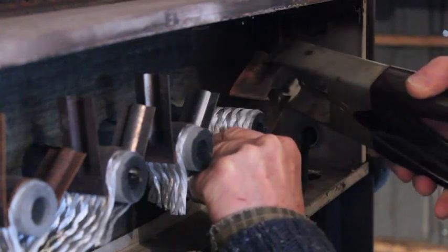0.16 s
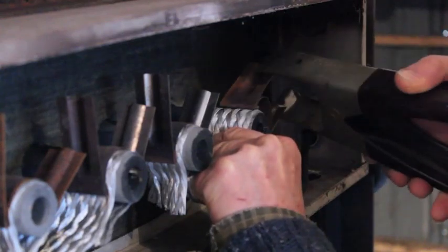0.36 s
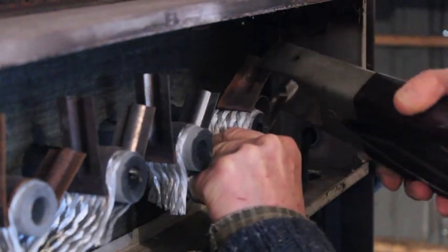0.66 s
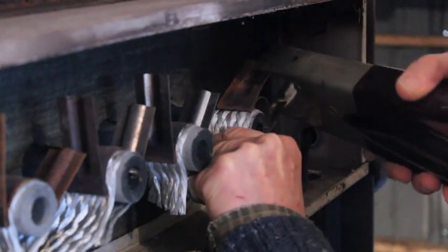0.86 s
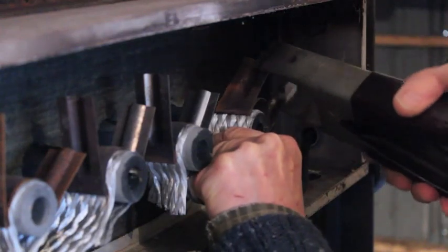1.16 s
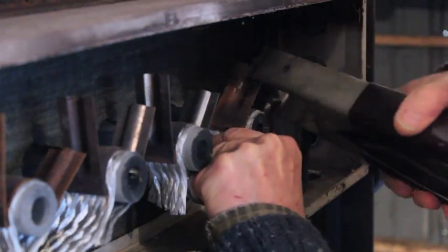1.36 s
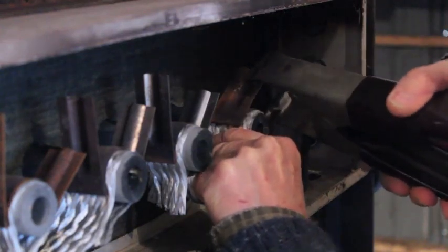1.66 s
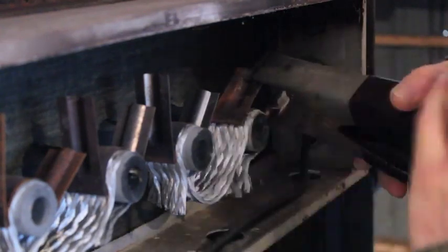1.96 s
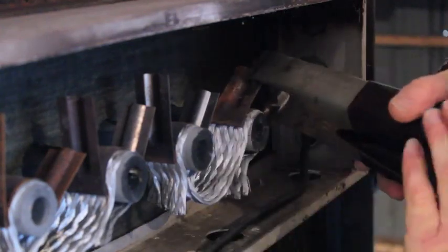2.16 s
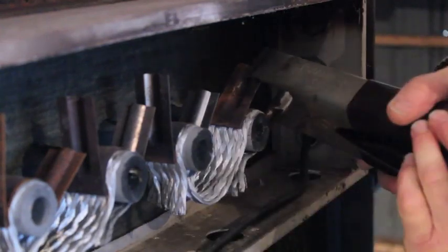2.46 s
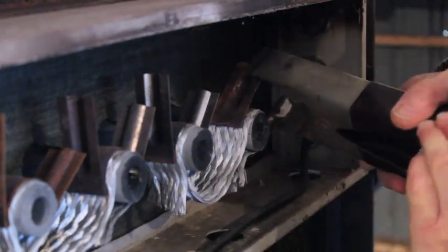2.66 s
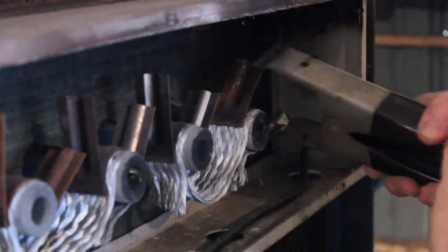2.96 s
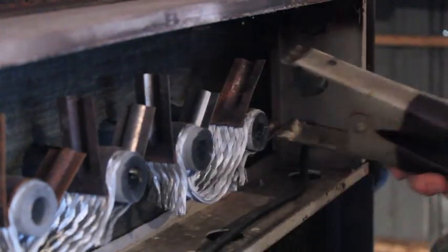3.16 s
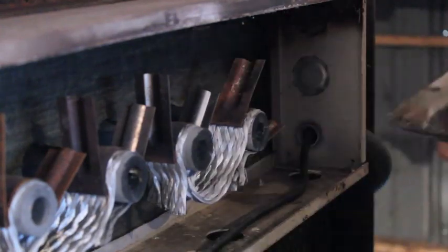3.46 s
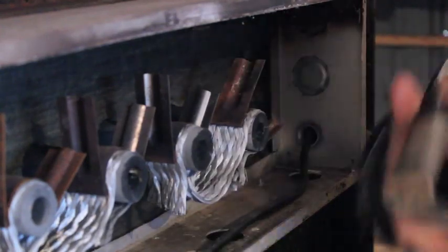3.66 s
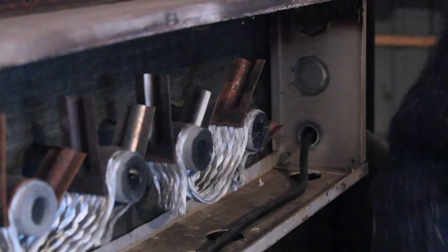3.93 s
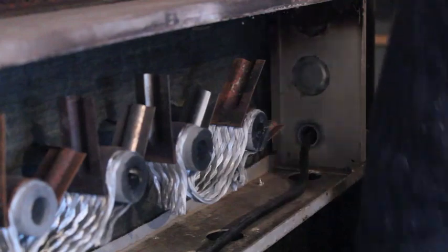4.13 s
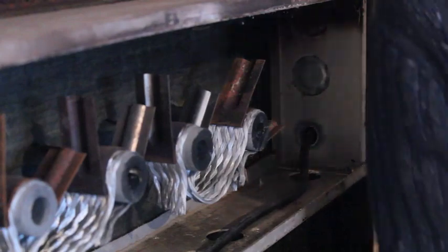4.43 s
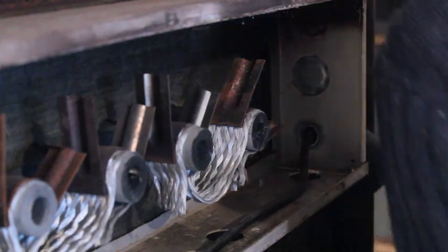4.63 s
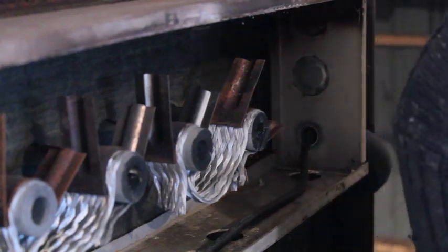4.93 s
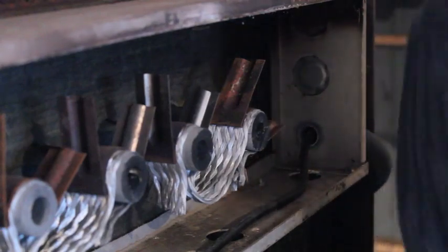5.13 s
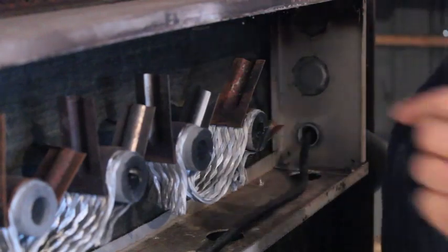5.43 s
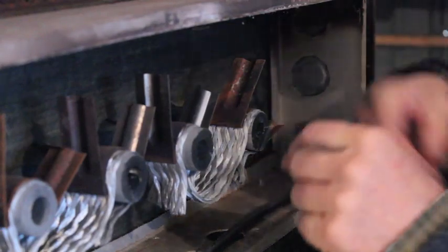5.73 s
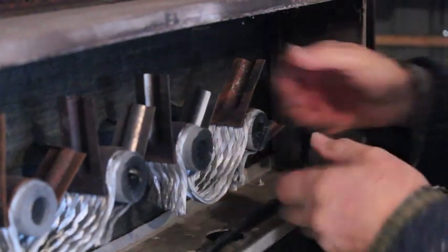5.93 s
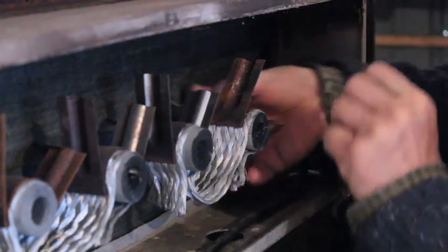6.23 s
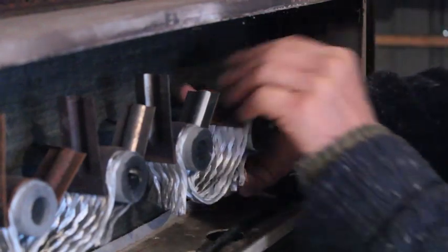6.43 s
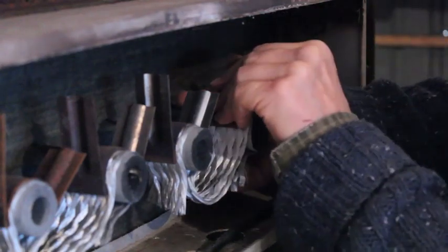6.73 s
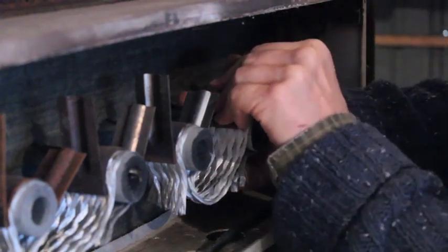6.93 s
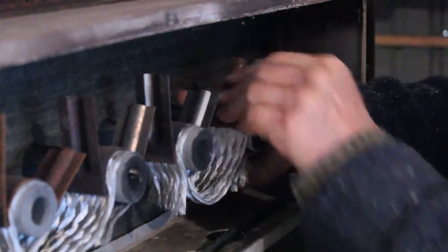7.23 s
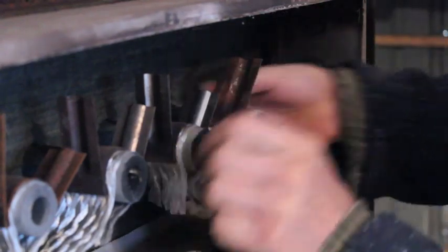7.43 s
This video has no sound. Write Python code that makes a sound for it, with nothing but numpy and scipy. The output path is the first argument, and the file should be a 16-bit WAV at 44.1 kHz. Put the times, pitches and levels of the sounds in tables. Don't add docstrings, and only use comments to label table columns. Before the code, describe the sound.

Small dry metal sounds over steady air hiss and a faint motor hum: light ticks and braid rustle, one hard snap, a quick clack and scrape, a ratchety spring creak ending in a thin ring, rough scraping into a bright knock, a short slide, then a tool put down in a double clunk. Near quiet follows, with cloth brushing and a brief bright rattle. Close microphone, short room echo.

```python
import sys
import numpy as np
from scipy import signal
from scipy.fft import rfft, irfft
from scipy.io import wavfile
from scipy.ndimage import uniform_filter1d

SR = 44100
rng = np.random.default_rng(int(sys.argv[2]) if len(sys.argv) > 2 else 0)


def store_wav(level_fs):
    pcm = np.round(np.clip(np.atleast_2d(level_fs), -1, 1) * 32767)
    wavfile.write(sys.argv[1], SR, pcm.T.astype(np.int16))


def to_linear_factor(level_db):
    exponent = np.asarray(level_db, float) / 20
    return 10 ** exponent


N = 334719
T = np.arange(N) / SR

# pitch_hz, density_db (per Hz)
SHOP_HISS = [(15, -47), (25, -6.5), (37, -16.5), (130, -12.5), (228, -6.5), (307, -7), (691, -5),
             (1040, -6.5), (4100, -13), (10000, -19), (15800, -17.5)]
# pitch_hz, t60_s
ROOM_DECAY = [(180, 0.27), (500, 0.26), (1200, 0.35), (3000, 0.38), (6000, 0.35), (11000, 0.13)]

# peak_s, swell_s, fade_s, level_db (at the peak)
SLEEVE_STROKES = [
    (5.787, 0.03, 0.057, -54.5),
    (6.22, 0.34, 0.22, -58.5),
    (6.45, 0.39, 0.085, -54.5),
    (6.59, .04, 0.054, -58),
    (7.37, 0.12, .012, -56.5),
]
BRAID_STROKES = [
    (.002, 0.0061, 0.019, -44.5),
    (.42, 0.01, 0.029, -53),
    (.685, 0.033, 0.06, -50.5),
    (.85, 0.026, 0.076, -55.5),
    (.964, .018, 0.059, -54),
    (1.1, 0.17, .04, -59.5),
    (1.258, 0.052, 0.038, -45.5),
    (1.375, 0.032, .03, -49),
    (1.528, 0.022, 0.072, -51.5),
    (1.6, 0.11, 0.024, -54),
]
GRATE_STROKES = [
    (1.393, 0.017, 0.0025, -26.5),
    (1.401, .003, 0.017, -36),
    (3.501, .002, .03, -40),
    (7.214, .002, .015, -45),
    (7.222, .002, 0.018, -42),
    (7.233, .002, .04, -48),
]
JAW_STROKES = [
    (2.6, 0.22, .19, -65),
    (2.8, 0.014, .004, -55),
    (2.84, 0.01, 0.028, -44),
    (2.867, 0.013, 0.029, -42.5),
    (2.9, 0.014, 0.056, -45),
    (2.98, .1, 0.071, -54),
    (3.086, 0.11, 0.0098, -44.5),
]
PULL_OFF_STROKES = [
    (1.8, 0.052, 0.34, -55.5),
    (1.895, 0.0096, 0.02, -34.5),
    (1.93, .006, .04, -46),
    (1.952, 0.0087, 0.082, -38.5),
    (1.98, 0.037, 0.071, -38.5),
]
DRAG_STROKES = [
    (3.18, 0.022, 0.086, -44.5),
    (3.226, 0.1, 0.073, -40),
]
LIFT_STROKES = [
    (3.3645, 0.003, 0.03, -42),
    (3.382, 0.035, 0.046, -36.5),
    (3.407, .02, 0.068, -39.5),
    (3.44, 0.019, .04, -37.5),
    (3.479, .008, 0.064, -43),
    (3.512, 0.02, 0.08, -37),
]
SLIDE_STROKES = [
    (4.125, 0.054, .02, -58),
    (4.14, 0.011, 0.091, -38.5),
    (4.172, 0.033, 0.038, -36.5),
    (4.192, .003, 0.022, -40),
    (4.209, 0.013, 0.048, -38),
    (4.24, 0.063, 0.009, -42.5),
]

# pitch_hz, density_db (per Hz)
CLOTH_TONE = [(600, -9.5), (1500, -5.5), (2500, -2), (5000, -6), (9000, -9.5), (16000, -12)]
BRAID_TONE = [(500, -8), (1500, -4.5), (3000, -1.5), (6000, -8.5), (10000, -10.5), (16000, -5)]
JAW_TONE = [(400, -2.5), (900, 0.5), (2000, -9), (5000, -0.5), (9000, -1), (16000, -13)]
PULL_OFF_TONE = [(230, -48), (468, -5.5), (723, -7), (890, 0.5), (1450, -3.5), (2600, 2), (10700, -8.5),
                 (16000, -17)]
DRAG_TONE = [(240, -35), (400, -29), (879, -9), (1330, -17), (1760, -6.5), (3070, -5.5), (4650, 1),
             (8630, -8), (16000, -29)]
LIFT_TONE = [(230, -16.5), (890, -2.5), (1380, -7), (2200, 1), (4410, -3.5), (4820, 0), (12100, -14.5),
             (16000, -21)]
SLIDE_TONE = [(120, -23), (439, -15.5), (689, -16.5), (821, -9), (1100, -16), (3100, -11), (5250, -9.5),
              (6770, -15.5), (10800, -17), (16000, -25)]
# pitch_hz, width_hz, level_db
CLOTH_PEAKS = [(2200, 420, 6), (5670, 240, 5), (7370, 200, 8.5)]
BRAID_PEAKS = [(3570, 170, 7.5), (5200, 300, 11.5), (6300, 280, 10), (7850, 570, 7.5), (10600, 320, 10.5),
               (11750, 250, 8), (15000, 350, -9)]
JAW_PEAKS = [(850, 180, 6), (1840, 510, 15), (3060, 120, 10.5), (4500, 310, 6), (6300, 200, 3),
             (9200, 270, -5), (14000, 500, 1)]

# start_s, level_db (peak)
CREAK_SLIPS = [(2.4928, -42), (2.5038, -42), (2.5197, -42), (2.5367, -41), (2.549, -46), (2.5611, -41),
               (2.5766, -41), (2.5851, -39), (2.597, -46), (2.6095, -44), (2.634, -46), (2.6604, -42),
               (2.6699, -41), (2.679, -44), (2.6919, -44), (2.7068, -40), (2.7462, -42), (2.772, -47),
               (2.7955, -46), (2.81, -45), (2.8368, -36), (2.8638, -32), (2.8987, -36), (2.9246, -32),
               (2.9444, -42), (2.964, -42), (3.005, -39), (3.0625, -39), (3.0858, -35)]
RATTLE_HITS = [(7.2108, -18), (7.2112, -18.5), (7.2122, -23), (7.2131, -21), (7.2164, -20), (7.2172, -25),
               (7.218, -13), (7.219, -12), (7.22, -24), (7.2275, -18), (7.2285, -22), (7.2295, -14.5),
               (7.2305, -26), (7.2317, -31), (7.24, -27), (7.241, -27), (7.248, -33), (7.2495, -40)]
LET_GO_HITS = [
    (1.889, -27),
    (1.897, -20.5),
    (1.9035, -18.5),
    (1.91, -29),
    (1.9165, -25.5),
]
LAID_HITS = [
    (4.9485, -18.5),
    (4.9508, -24),
    (4.9527, -12),
    (4.9555, -13),
    (4.959, -19.5),
    (4.963, -17),
    (4.968, -18),
    (4.975, -26),
    (4.984, -31),
    (4.99, -25),
]
ROCK_HITS = [(5.0075, -14), (5.0095, -11), (5.013, -24), (5.018, -22), (5.0235, -19), (5.029, -25),
             (5.036, -13.5), (5.0385, -12), (5.0445, -18), (5.05, -27), (5.057, -18), (5.064, -29),
             (5.071, -29), (5.078, -37)]
SNAP_HITS = [
    (1.3928, -14.5),
    (1.3953, -10),
    (1.3968, -14.5),
]
KNOCK_HITS = [(3.4961, -8.5), (3.4967, -8.5), (3.4975, -10), (3.4985, -17), (3.5022, -23), (3.5056, -17),
              (3.5068, -19), (3.5085, -20), (3.511, -22), (3.5355, -30), (3.585, -42)]

# pitch_hz, density_db (per Hz)
CLIP_TONE = [(250, -25), (350, -5), (600, -20), (1800, -10.5), (4000, -18.5), (6000, -8.5), (8500, -9),
             (10500, -6), (13300, -12), (16000, -7.5)]
LET_GO_TONE = [(150, -42), (250, -17), (468, -5), (1280, 1.5), (1880, 4), (4340, -18), (8700, -19),
               (16000, -27)]
LAID_TONE = [(35, -61), (60, -14), (503, -8), (880, -4), (1170, -3.5), (2250, -11), (4500, -23.5),
             (16000, -42)]
ROCK_TONE = [(35, -62), (60, -30), (579, 0), (651, -8), (749, -4.5), (1300, -10.5), (2900, -15.5),
             (16000, -37)]
SNAP_TONE = [(150, -54), (550, -15), (980, -2.5), (1500, -3.5), (2250, -4.5), (2900, -11), (10300, -13.5),
             (16000, -35)]
KNOCK_TONE = [(200, -32), (600, -23), (1000, -11), (1500, -12), (3000, -9.5), (4800, -4.5), (6000, -11),
              (11000, -16), (16000, -18)]
# pitch_hz, width_hz, level_db
SPRING_PEAKS = [(5500, 600, 7.5), (7400, 440, 13), (9500, 460, 5), (13000, 3100, 13), (15000, 700, 13)]
CLIP_PEAKS = [(5500, 410, 10), (6700, 600, 3), (10100, 500, 11), (11700, 640, 4), (15000, 830, 2)]
LAID_PEAKS = [(520, 190, 8), (1150, 120, 0), (2300, 140, 8), (3100, 180, 3)]
ROCK_PEAKS = [(800, 240, 3.5), (2300, 710, 4.5), (3020, 130, 3), (3700, 170, -2), (4500, 230, 1)]
SNAP_PEAKS = [(950, 350, 8), (2200, 220, 7.5), (3500, 240, -1), (5200, 310, 9)]
KNOCK_PEAKS = [(940, 110, 11.5), (2070, 400, 11.5), (3700, 280, 15.5), (8300, 670, 13.5), (11500, 600, 8)]
# pitch_hz, level_db, t60_s
BENCH_MODES = [(79, -35, 0.18), (145, -32, 0.091), (250, -15, 0.072), (410, -25, 0.08), (498, -11.5, 0.031),
               (580, -25, 0.06), (840, -32, 0.05), (996, -25, 0.083), (1160, -38, 0.036),
               (1620, -29, 0.057), (2194, -33, 0.055), (2870, -33, 0.073)]
CABINET_MODES = [(80.6, -43, 0.41), (111.4, -40.5, 0.35), (186, -38, 0.23), (317, -35.5, 0.41),
                 (355, -43, 0.16), (467, -30.5, 0.13), (880, -36, .2), (986, -33.5, 0.45), (2220, -45, 0.2),
                 (4400, -42, 0.05), (5800, -40, 0.11)]
TOOL_MODES = [(257, -41.5, 0.093), (650, -46, .08), (1173, -37, 0.2), (2260, -32, 0.11), (3700, -40, 0.09),
              (2970, -26.5, 0.1), (5000, -34, .06)]

# start_s, level_db (peak), pitch_hz
STRAY_TICKS = [(.008, -39, 1440), (.417, -46, 3000), (.428, -44, 9000), (0.679, -36, 5770),
               (0.708, -37.5, 6440), (0.931, -38, 4500), (.933, -40.5, 2300), (1.054, -47, 4500),
               (1.269, -42, 7000), (1.606, -41, 5200), (1.931, -26.5, 6500), (1.935, -34, 6000),
               (1.959, -30, 2500), (1.966, -18.5, 7040), (2.645, -41, 4200), (2.823, -40, 4500),
               (2.846, -44, 12000), (2.872, -40, 12500), (2.886, -44, 11000), (2.937, -39, 12000),
               (3.053, -35, 7000), (3.0655, -30, 5000), (3.3638, -37, 9000), (3.375, -37, 12000),
               (3.3805, -34, 12000), (3.387, -34, 12500), (3.392, -33, 12000), (3.419, -32, 10000),
               (3.45, -22.5, 1640), (3.461, -27, 2480), (3.476, -40, 11000), (3.485, -36, 11500),
               (3.493, -29, 11500), (5.0358, -21, 3280), (5.0092, -26, 3280), (3.535, -33, 13000),
               (4.233, -33, 5000), (4.183, -32, 5000), (3.708, -38, 780), (3.74, -41.5, 835),
               (3.748, -32.5, 3670), (4.113, -39, 8500), (7.2112, -19, 11000), (4.825, -35.5, 2200),
               (3.4966, -13.5, 8500), (7.2182, -19, 10000), (7.351, -44, 12000)]
# start_s, pitch_hz, level_db (peak), rise_s, t60_s
SINGLE_RINGS = [(0.004, 887, -39, 0.0017, 0.054), (2.86, 817, -55, 0.018, 0.41),
                (2.8985, 7800, -34, .0004, .015), (2.924, 7730, -24, .0005, 0.0094),
                (3.033, 1007, -37.5, 0.0033, 0.098), (3.063, 4965, -35, 0.0062, 0.62),
                (3.068, 4965, -22.5, 0.027, 0.24), (3.085, 13000, -56, 0.0032, .2),
                (3.449, 996, -31, 0.00073, 0.15), (3.451, 1030, -49, 0.00077, 0.043),
                (4.071, 1657, -40, 0.0091, 0.069), (7.366, 2060, -46, .003, 0.054),
                (3.4962, 3720, -21, .0003, .03), (3.4953, 8410, -22, .0002, 0.016),
                (3.5053, 3780, -32, .0005, 0.025), (3.535, 3780, -38, .001, .06),
                (3.497, 893, -29, 0.0013, .04), (4.951, 518, -8, .002, 0.035), (5.043, 703, -18.5, .001, .03),
                (5.012, 520, -15, .002, 0.044), (5.0365, 2910, -23.5, .0005, 0.031),
                (5.037, 825, -19.5, .001, .06), (5.056, 1000, -22, .004, 0.074),
                (1.402, 250, -43, .006, 0.24), (1.53, 5200, -51, .004, .1), (1.59, 5200, -52, .004, .06),
                (2.838, 5000, -40, .002, .04)]
# start_s, length_s, pitch_hz, level_db
SINGING_CHAFES = [(.63, .045, 5100, -66), (.68, .035, 7600, -72), (.838, 0.057, 6200, -63),
                  (.85, .04, 5500, -65), (.852, .025, 8600, -70), (.965, .04, 3500, -61),
                  (1.1, 0.077, 5100, -79), (0.9, 0.027, 3060, -72), (1.225, .065, 10700, -59),
                  (1.23, 0.067, 3700, -61), (1.262, 0.018, 6700, -61), (1.3, .03, 10700, -65),
                  (1.381, 0.024, 10600, -47), (1.42, 0.025, 2200, -55), (1.852, 0.039, 5500, -51),
                  (1.89, 0.016, 11000, -43), (1.945, 0.051, 10600, -47), (2.5, .22, 7500, -75),
                  (2.52, 0.22, 9400, -69), (2.84, 0.17, 851, -58), (2.851, 0.041, 4930, -44),
                  (2.855, .045, 8750, -56), (2.88, 0.028, 860, -43.5), (2.897, 0.034, 7850, -50),
                  (2.953, .008, 7800, -53), (3.002, 0.0052, 7500, -47), (3.03, .025, 9100, -63),
                  (2.898, 0.043, 4760, -51.5), (2.958, .05, 8850, -56), (2.98, .04, 14000, -58),
                  (3.012, 0.052, 8600, -62), (2.7, 0.037, 10700, -68), (3.372, 0.0093, 3490, -38),
                  (3.378, 0.016, 5200, -42), (4.158, .022, 5200, -39), (4.19, 0.014, 5400, -32),
                  (4.204, 0.011, 5200, -35), (4.15, .012, 8500, -46), (1.423, 0.017, 5800, -54),
                  (6.134, 0.16, 6300, -66), (6.17, 0.073, 5200, -66), (7.31, .025, 9000, -63),
                  (7.355, .025, 9500, -61), (7.368, .011, 6100, -65)]
# start_s, length_s, pitch_hz, level_db
BROAD_SCUFFS = [(1.353, 0.066, 3400, -53), (1.399, 0.046, 660, -50.5), (1.41, 0.049, 118, -54),
                (1.415, 0.034, 227, -46.5), (1.851, 0.032, 5460, -57), (1.93, 0.01, 6200, -41),
                (1.4, 0.035, 1480, -53), (1.95, 0.02, 5670, -42), (3.155, 0.07, 8800, -54),
                (3.24, 0.085, 5800, -53), (3.33, 0.1, 5430, -49), (3.427, 0.041, 2200, -44),
                (3.434, 0.016, 5000, -37.5), (4.104, 0.071, 800, -58), (4.131, 0.023, 1070, -46),
                (4.146, 0.046, 4640, -36.5), (4.19, 0.026, 4900, -36), (1.4, .06, 294, -46),
                (7.25, 0.033, 6000, -62), (4.195, .04, 11000, -50)]


def rms_one(x):
    return x / np.sqrt(np.mean(x ** 2) + 1e-20)


def add(out, s, sound):
    i = round(s * SR)
    out[i:i + len(sound)] += sound[:N - i]


def resonant(drive, hz, width_hz):
    radius = np.exp(-np.pi * width_hz / SR)
    angle = 2 * np.pi * hz / SR
    b, a = [1, 0.0016, -1], [1, -2 * radius * np.cos(angle), radius * radius]
    once = signal.lfilter(b, a, drive)
    return rms_one(signal.lfilter(b, a, once))


def body(tone, peaks=(), size=4096):
    hz = np.maximum(np.arange(size // 2 + 1) * SR / size, 1)
    tone_hz, tone_db = np.array(tone).T
    gain = to_linear_factor(np.interp(np.log(hz), np.log(tone_hz), tone_db))
    for centre, width, db in peaks:
        gain = gain * (1 + (to_linear_factor(db) - 1) / np.sqrt(1 + (2 * (hz - centre) / width) ** 4))
    cepstrum = irfft(np.log(gain + 1e-9))
    cepstrum[1:size // 2] *= 2
    cepstrum[size // 2 + 1:] = 0
    response = irfft(np.exp(rfft(cepstrum)))
    return response / np.sqrt(np.sum(response ** 2))


def catches(size, per_s, spread_db):
    sizes = to_linear_factor(spread_db * np.minimum(rng.exponential(1, size), 4)) * rng.standard_normal(size)
    caught = rng.random(size) < per_s / SR
    return rms_one(sizes * caught + 1e-9)


def rub(strokes, response, per_s, spread_db):
    edge_db, roundness = 22.5, 1.46
    power = np.zeros(N)
    for s, swell, fade, db in strokes:
        near = slice(max(0, int((s - 2 * swell) * SR)), int((s + 2 * fade) * SR))
        away = np.abs(T[near] - s) / np.where(T[near] < s, swell, fade)
        power[near] += to_linear_factor(db - edge_db * away ** roundness) ** 2
    friction = catches(N, per_s, spread_db) * np.sqrt(power)
    return signal.oaconvolve(friction, response)[:N]


def crunch(decay_s, size=4096):
    spectrum = rfft(rng.standard_normal(size) * np.exp(-T[:size] / decay_s))
    even = spectrum / np.sqrt(uniform_filter1d(np.abs(spectrum) ** 2, size=24))
    return irfft(even)[:size // 2]


def mode_ring(hz, split_hz):
    t = T[:SR // 3]
    swell = 1 - np.exp(-(t * hz / 1.2) ** 2)
    places = np.linspace(-1, 1, 4)[:, None] + rng.uniform(-0.27, 0.24, (4, 1))
    twins_hz = hz + (split_hz + 0.0039 * hz) * places
    beating = np.sin(2 * np.pi * (twins_hz * t + rng.random((4, 1)))).sum(axis=0)
    return swell * beating


def blows(events, response, crunch_s, modes=(), split_hz=22):
    out, t = np.zeros(N), T[:SR // 3]
    for s, peak_db in events:
        crack = signal.oaconvolve(crunch(crunch_s), response)
        add(out, s, to_linear_factor(peak_db) * crack / np.abs(crack).max())
        for hz, db, t60 in modes:
            mode_db = peak_db + db - 5.5 + 3.0 * rng.standard_normal()
            add(out, s, to_linear_factor(mode_db - 60 * t / t60) * mode_ring(hz, split_hz))
    return out


def workshop():
    hiss = signal.oaconvolve(rng.standard_normal(N + 8192), body(SHOP_HISS, size=8192))[8192:N + 8192]
    load = np.clip(2 * (T - 2.76) + .5, 0, 1)
    hum_idle_db, hum_loaded_db = -86, -71.5
    rumble_idle_db, rumble_loaded_db = -72.5, -79
    hum_db = hum_idle_db + (hum_loaded_db - hum_idle_db) * load
    rumble_db = rumble_idle_db + (rumble_loaded_db - rumble_idle_db) * load
    hum = to_linear_factor(hum_db) * resonant(rng.standard_normal(N), hz=125.7, width_hz=27)
    rumble = to_linear_factor(rumble_db) * resonant(rng.standard_normal(N), hz=65.6, width_hz=92)
    return to_linear_factor(-55.5) * hiss + hum + rumble


def room(x):
    t, tail = T[:SR // 2], 0
    for hz, t60 in ROOM_DECAY:
        band = signal.butter(2, [hz / 2.27, min(hz * 2.03, 19000)], "band", fs=SR, output="sos")
        noise = rms_one(signal.sosfilt(band, rng.standard_normal(len(t))))
        tail = tail + noise * np.sqrt(hz) * to_linear_factor(-60 * t / t60)
    tail = tail * (1 - np.exp(-t / 0.00074))
    return signal.oaconvolve(x, tail / np.sqrt(np.sum(tail ** 2)))[:N]


def sleeves():
    return rub(SLEEVE_STROKES, body(CLOTH_TONE, CLOTH_PEAKS), per_s=12000.0, spread_db=1.5)


def clip_rattle():
    return blows(RATTLE_HITS, body(CLIP_TONE, CLIP_PEAKS), crunch_s=0.0004)


def ticks():
    out, step = np.zeros(N), 2 ** 0.69
    for s, peak_db, hz in STRAY_TICKS:
        tone = [(hz / step ** 2, -30), (hz / step, -7), (hz, 0), (hz * step, -8), (hz * step ** 2, -36)]
        out += blows([(s, peak_db)], body(tone), crunch_s=.0008)
    return out


def rings():
    out, t = np.zeros(N), T[:SR // 2]
    for s, hz, peak_db, rise, t60 in SINGLE_RINGS:
        envelope = to_linear_factor(peak_db - 60 * t / t60) * (1 - np.exp(-t / rise))
        add(out, s, envelope * np.sin(2 * np.pi * hz * t))
    held = np.interp(T, [3.16, 3.18], [1, 0], right=0) + (T > 3.3)
    return out * held


def chafes(rows, width):
    out = np.zeros(N)
    for s, length, hz, db in rows:
        stroke = np.sqrt(np.sin(np.pi * np.clip(T[:SR // 4] / length, 0, 1)) + 1e-12)
        friction = catches(SR // 4, per_s=16000.0, spread_db=-1.5)
        add(out, s, to_linear_factor(db) * stroke * resonant(friction, hz, width * hz))
    return out


def braid():
    return rub(BRAID_STROKES, body(BRAID_TONE, BRAID_PEAKS), per_s=9800.0, spread_db=0.0)


def jaws():
    slide = rub(JAW_STROKES, body(JAW_TONE, JAW_PEAKS), per_s=9000.0, spread_db=1.5)
    creak = blows(CREAK_SLIPS, body(JAW_TONE, SPRING_PEAKS), crunch_s=0.0017)
    return slide + creak


def let_go():
    return blows(LET_GO_HITS, body(LET_GO_TONE), crunch_s=0.00027)


def tool_over_steel():
    out = rub(PULL_OFF_STROKES, body(PULL_OFF_TONE), per_s=8000.0, spread_db=2.5)
    out += rub(DRAG_STROKES, body(DRAG_TONE), per_s=11000.0, spread_db=-1.5)
    out += rub(LIFT_STROKES, body(LIFT_TONE), per_s=10000.0, spread_db=1.8)
    out += rub(SLIDE_STROKES, body(SLIDE_TONE), per_s=14000.0, spread_db=1.0)
    return out


def tool_on_bench():
    laid = blows(LAID_HITS, body(LAID_TONE, LAID_PEAKS), 0.0022, BENCH_MODES, split_hz=6.3)
    rocked = blows(ROCK_HITS, body(ROCK_TONE, ROCK_PEAKS), 0.0018, BENCH_MODES, split_hz=3.9)
    return laid + rocked


def tool_knock():
    return blows(KNOCK_HITS, body(KNOCK_TONE, KNOCK_PEAKS), 0.00057, TOOL_MODES)


def clamp_snap():
    snap = blows(SNAP_HITS, body(SNAP_TONE, SNAP_PEAKS), 0.00078, CABINET_MODES)
    grate = rub(GRATE_STROKES, body(BRAID_TONE, BRAID_PEAKS), per_s=10000.0, spread_db=1.0)
    return snap + grate


def scene():
    inside = sleeves() + ticks() + rings()
    inside += chafes(SINGING_CHAFES, width=0.05) + chafes(BROAD_SCUFFS, width=0.33)
    inside += braid() + jaws() + let_go()
    outside = tool_over_steel() + tool_on_bench()
    rattle, knock, snap = clip_rattle(), tool_knock(), clamp_snap()
    to_room = to_linear_factor(-10.5) * inside + to_linear_factor(-6) * outside
    to_room += to_linear_factor(-17) * knock + to_linear_factor(-21) * rattle + to_linear_factor(-16) * snap
    work = inside + outside + knock + rattle + snap + room(to_room)
    low_cut = signal.butter(8, 58, "high", fs=SR, output="sos")
    return (signal.sosfilt(low_cut, work) + workshop())[None]


def band_limit(x):
    return signal.sosfilt(signal.butter(12, 17040, fs=SR, output="sos"), x)


def record(dry):
    top_cut = signal.ellip(12, .3, 52, 15850, fs=SR, output="sos")
    mix = signal.sosfilt(top_cut, dry) + .0015
    return band_limit(mix)


dry = scene()
out = record(dry)
store_wav(out)
```